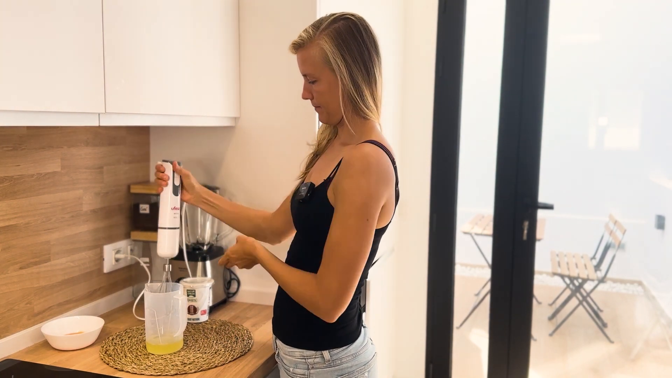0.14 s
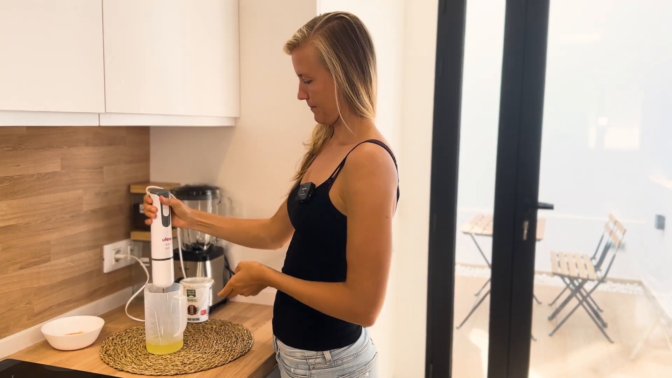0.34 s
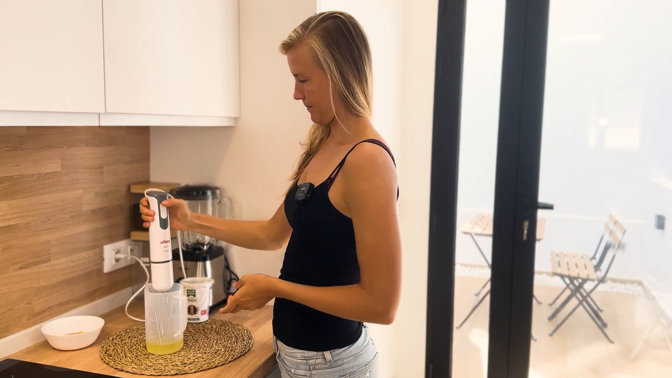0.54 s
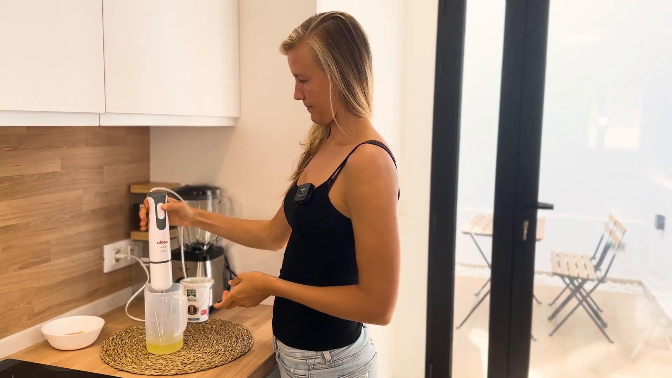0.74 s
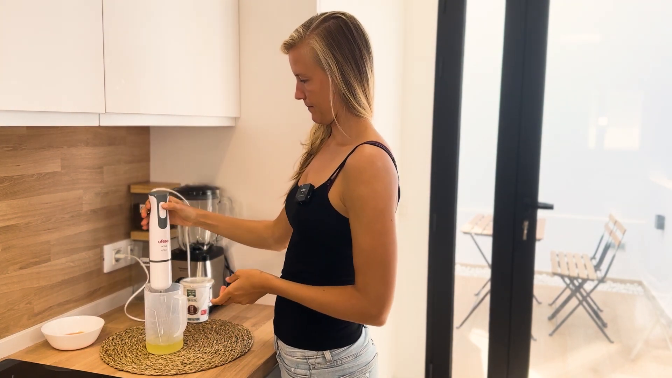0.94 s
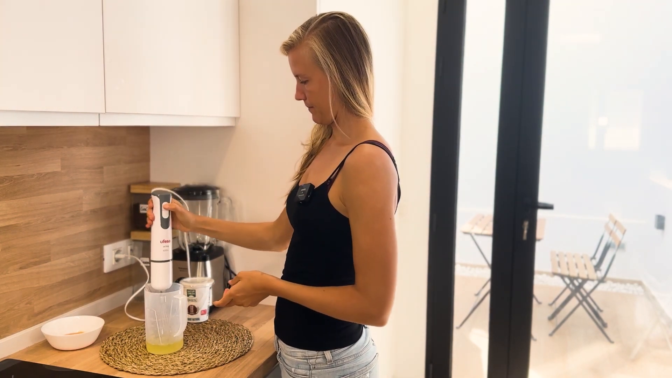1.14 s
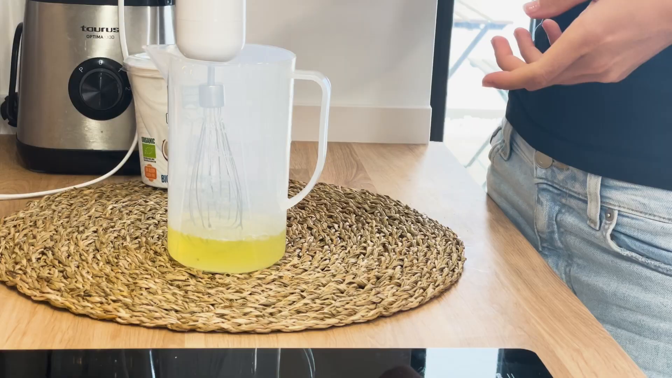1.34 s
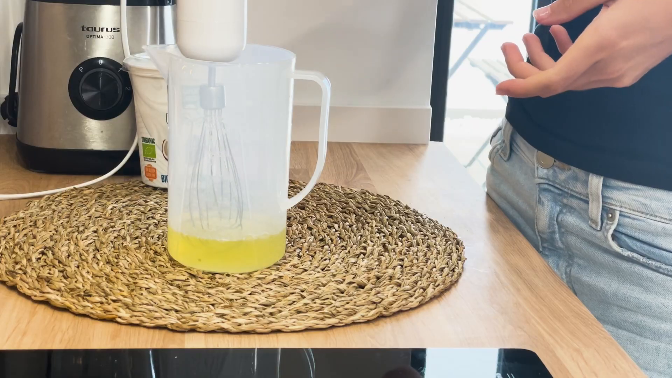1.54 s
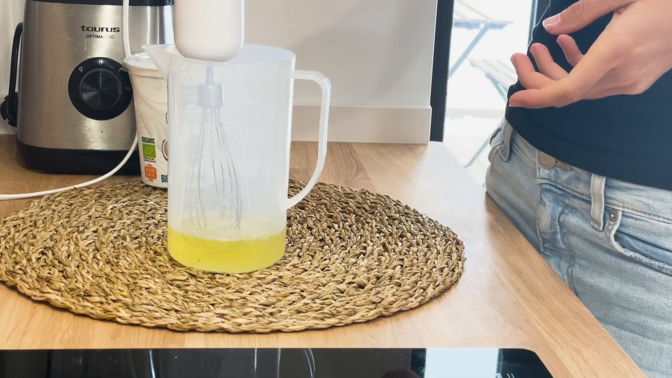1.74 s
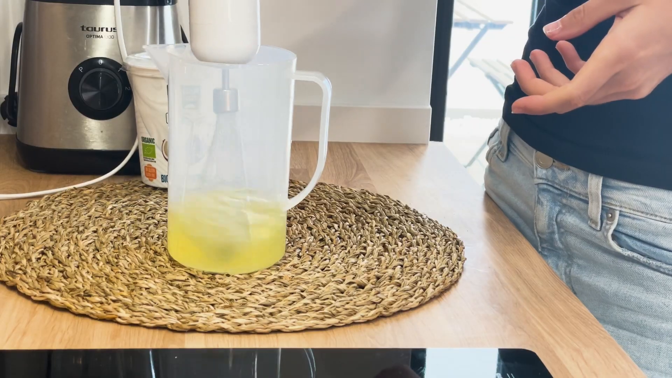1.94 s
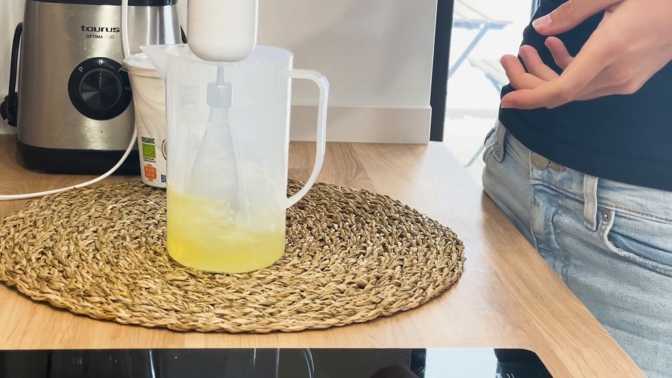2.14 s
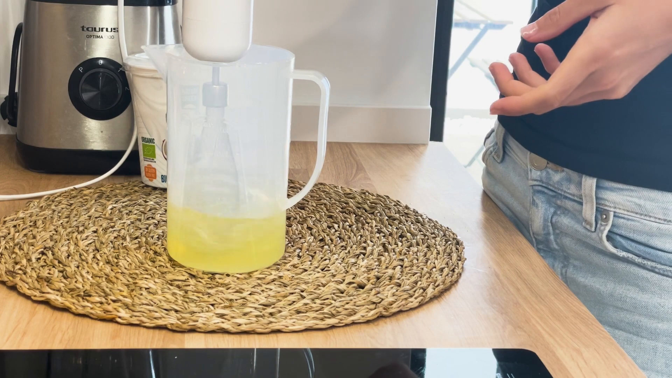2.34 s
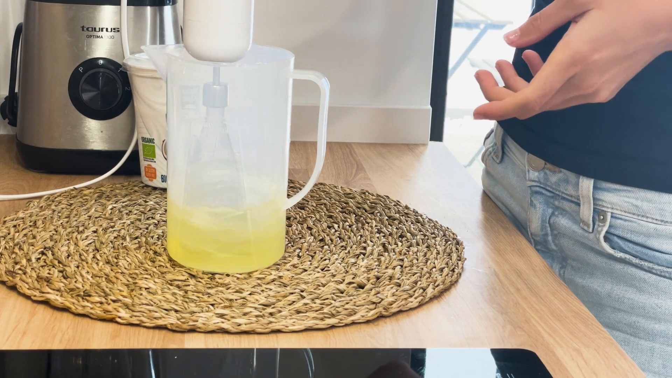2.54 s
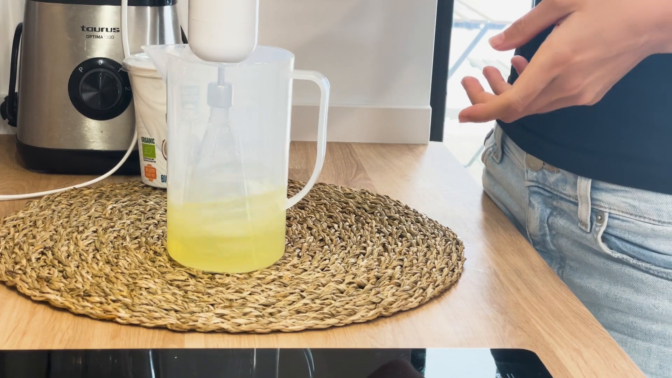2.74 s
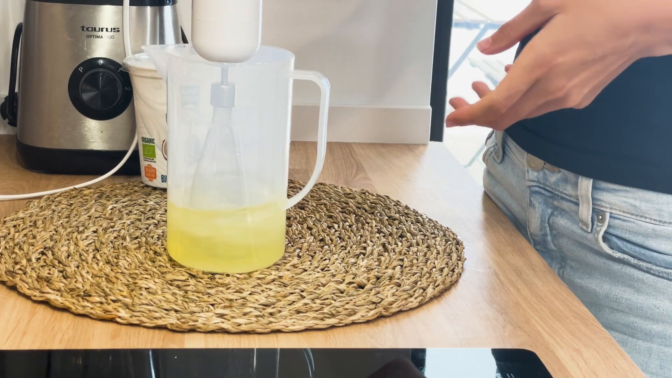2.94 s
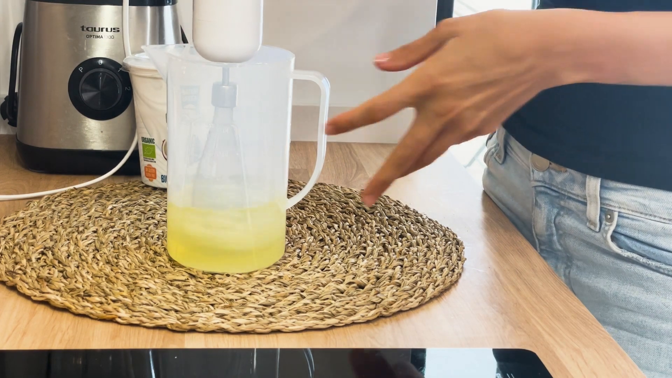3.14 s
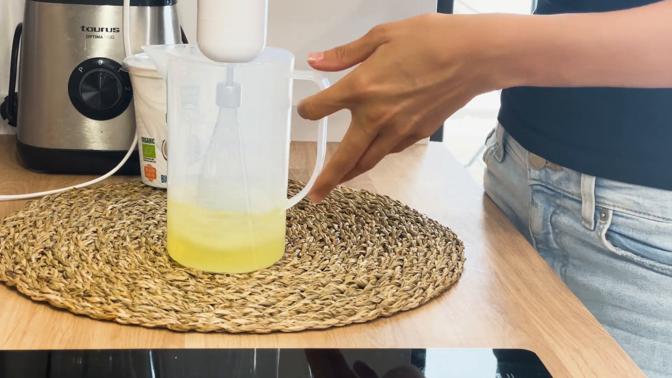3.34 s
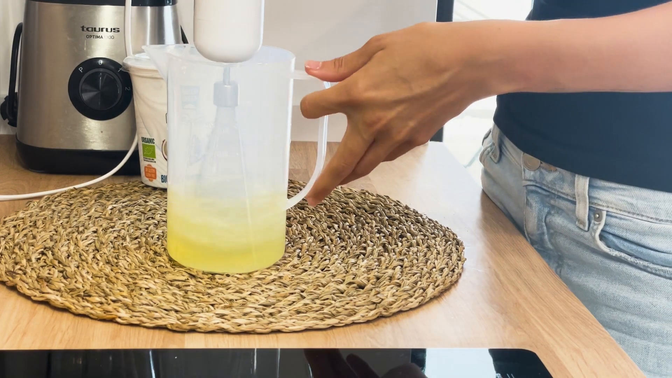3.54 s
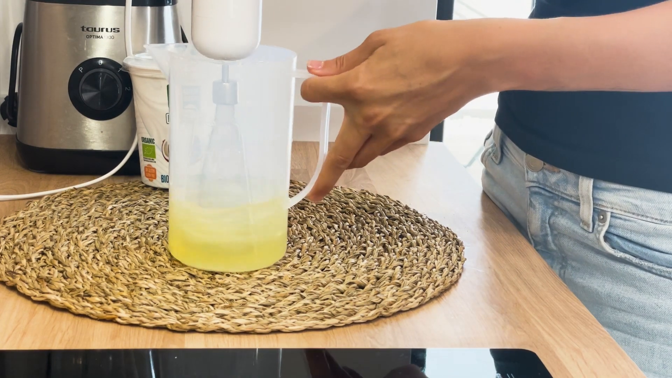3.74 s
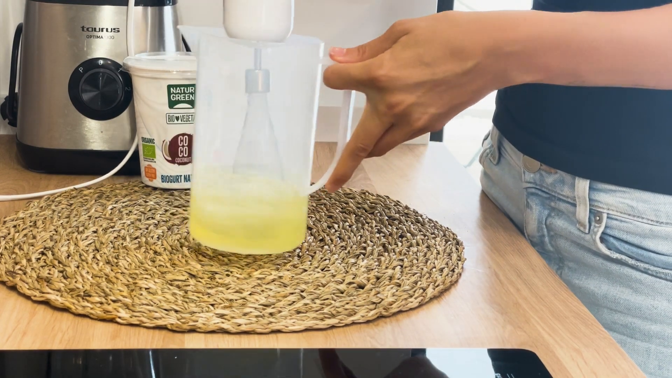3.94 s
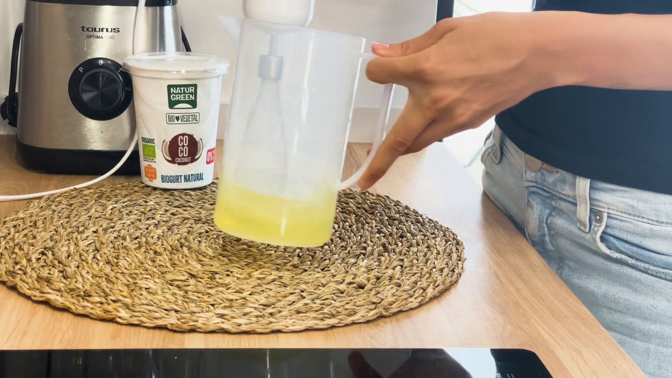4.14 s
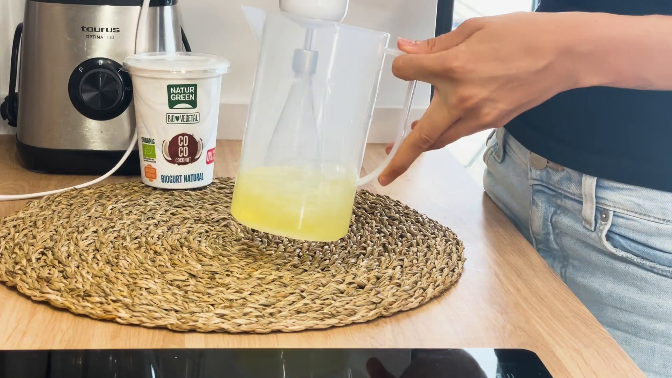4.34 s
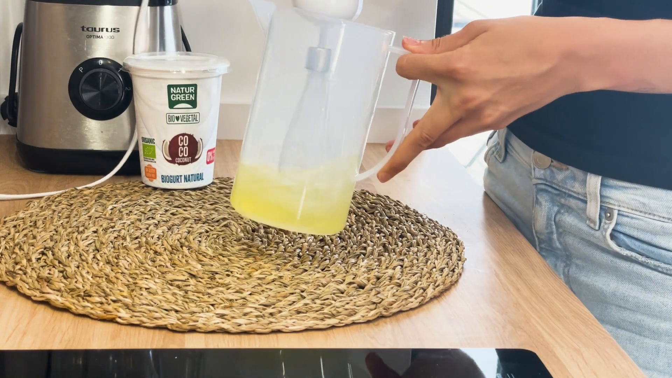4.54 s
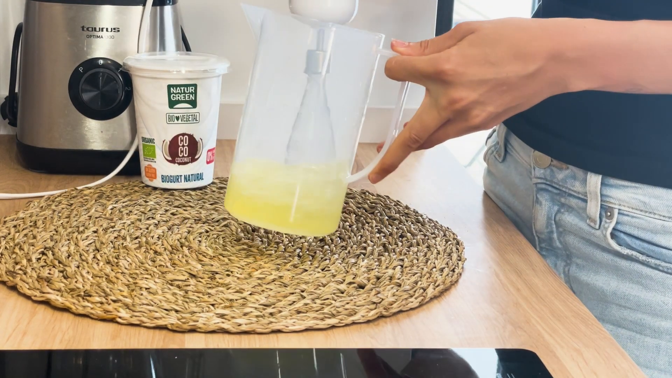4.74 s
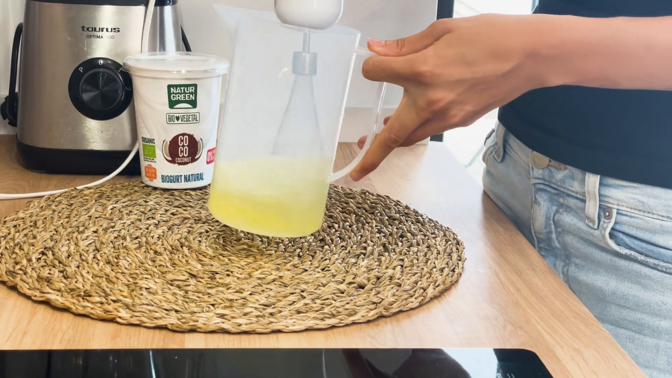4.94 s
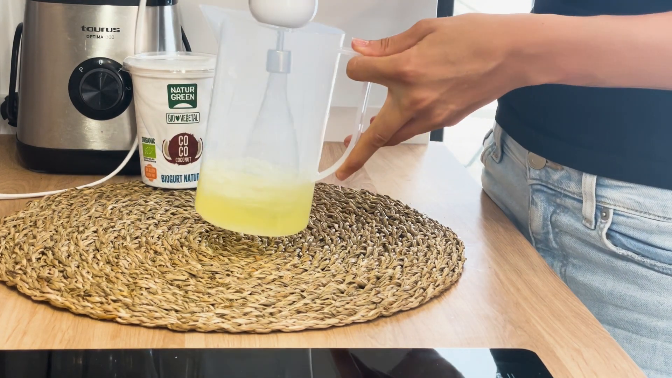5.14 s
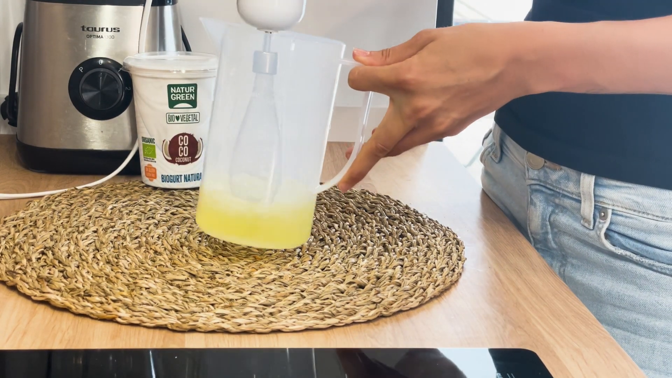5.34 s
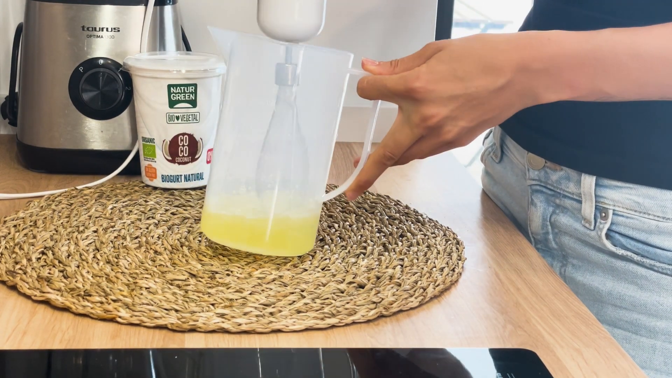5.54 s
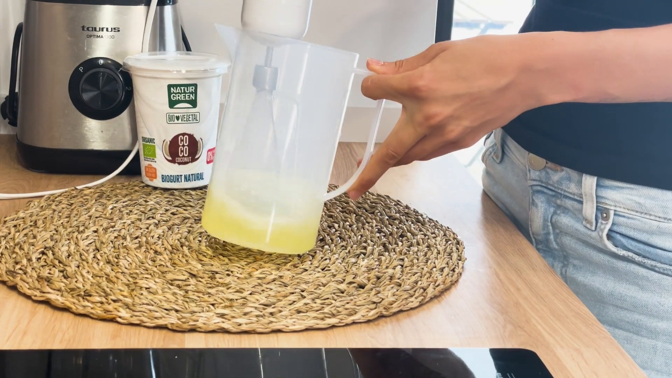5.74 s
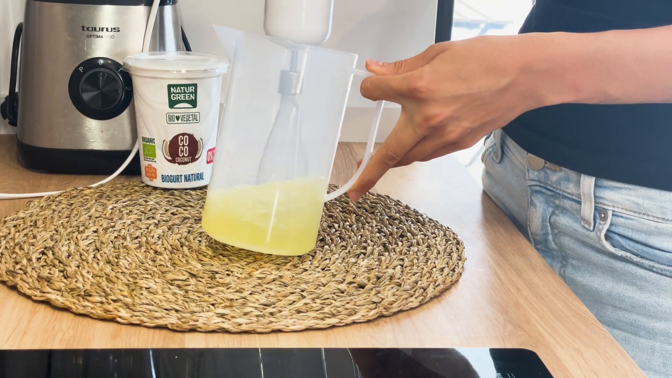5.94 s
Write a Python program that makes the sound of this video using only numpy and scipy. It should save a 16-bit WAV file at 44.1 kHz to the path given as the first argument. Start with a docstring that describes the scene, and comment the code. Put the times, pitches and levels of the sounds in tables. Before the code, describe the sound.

A wire whisk taps a plastic jug amid small grip clicks, then a hand blender whirs up, whining, hissing and clattering through liquid egg.

```python
"""A wire whisk on a hand blender knocks on a plastic jug of egg as it is lowered in, amid small grip clicks.
Switched on, the motor whines up to speed and hisses; the whisk slaps and sprays egg on the wall of the jug.
Pressed down, it drums and clatters on the bottom; then the jug is tilted and the motor eases up a little.
Ringing parts are noise or small contacts sent through resonances; the whine is a stack of sine waves.
Soft bumps boom through the counter. A small room is heard through two close microphone ports."""
import sys
import numpy as np
from scipy import signal
from scipy.fft import rfft, irfft, next_fast_len
from scipy.io import wavfile
from scipy.ndimage import uniform_filter1d, map_coordinates

SR = 44100
rng = np.random.default_rng(int(sys.argv[2]) if len(sys.argv) > 2 else 0)


def pcm_store(signal):
    """Save signal as 16-bit PCM."""
    levels = np.round(np.clip(np.atleast_2d(signal), -1, 1) * 32767)
    wavfile.write(sys.argv[1], SR, levels.astype(np.int16).T)


N = 264159
TIME = np.arange(N) / SR  # seconds

SWITCH_ON_S, SPIN_UP_S = 1.707, 0.042  # the machine's sound fades in over SPIN_UP_S
PRESS_S, LIFT_S = 2.289, 3.55  # the whisk is pressed on the bottom of the jug between these times
# motor turns per second under load and once eased; time scales of the run-up and the easing
LOADED_HZ, FREE_HZ, RUN_UP_S, EASE_S = 262, 265.3, 0.06, 0.9
GEAR_RATIO = 12.8  # motor turns for one whisk turn
# layers that follow the effort: (level_db at mean effort, db gained per db of effort)
HISS_LAW, WALL_LAW, BOOM_LAW = (-30, 0.88), (-30.5, 1.25), (-39, 1.7)
SLOSH_SHARE, SLOSH_PER_S = 0.025, 5  # stray of the jug's pitches as a share, and how often
REBOUND_DB = -21  # a second touch, one whisk turn later, against the first
CUTOFF_HZ = 15750  # top of the microphone's range

# Levels in these tables are relative, unless a function uses them as they stand.
# quiet room: pitch_hz, level_db (per Hz)
ROOM_HUSH = [(30, -17), (60, -2), (110, 11.5), (220, 5), (400, -5.5), (1000, -16), (2500, -34), (4000, -39),
             (15000, -51)]
# difference between the two ports: pitch_hz, left_lead_rad
PORT_PHASE = [(330, 0), (470, -.6), (560, -2), (600, -3.6), (700, -4.5), (860, -7.3), (1150, -7.1),
              (1550, -6.28), (2400, -6.28), (3200, -6.9), (4200, -6.5), (5300, -6.6), (5750, -4.7),
              (6750, -5.5), (7600, -4.1), (8750, -3.14), (11800, -1.4), (13100, 0)]
# difference between the two ports: pitch_hz, left_minus_right_db
PORT_BALANCE = [(60, -4), (170, 5), (340, -0.5), (480, 5.5), (620, 2.5), (850, 2.5), (950, 3.5), (1600, 0)]
# room sound that the ports do not share: pitch_hz, level_db
ROOM_WIDTH = [(150, -12), (400, -7), (700, 6), (1100, -2.5), (1800, -22.5), (3500, -5), (6500, -14),
              (8700, -17.5), (11000, 0.5), (14000, -20)]
# jug bottom on the counter: pitch_hz, width_hz, level_db
COUNTER = [(100.6, 8.7, -2), (130.6, 33.5, 0.5)]
# soft bumps through the counter: start_s, peak_db
BUMPS = [(0.039, -46), (0.107, -40.5), (0.518, -40.5), (0.655, -41), (0.83, -50), (0.923, -30.5),
         (1.029, -32), (1.645, -35), (1.742, -19.5), (1.893, -28.5), (2.005, -29), (4.327, -35.5),
         (4.99, -32.5), (5.17, -34), (5.27, -40), (5.343, -28.5), (5.69, -40)]
# fingers on the grip and switch: start_s, peak_db, hollow_knock_db, length_s, brightness_hz
TICKS = [(0.187, -42.5, -112, 0.086, 10300), (0.271, -40, -47, 0.0054, 3520),
         (0.295, -37, -37.5, 0.0052, 3840), (0.373, -28, -36, 0.0029, 12500),
         (0.722, -50, -84, 0.011, 6800), (0.884, -40, -82, 0.039, 5000), (1.336, -42.5, -88, 0.028, 1620),
         (1.382, -45, -82, 0.0025, 7200), (1.432, -62, -91, 0.06, 1770), (1.562, -54, -87, 0.1, 3000),
         (1.623, -34, -59.5, 0.0097, 2600)]
# hollow grip: pitch_hz, width_hz, level_db
GRIP = [(230, 32, 9), (292, 11, 1), (420, 110, -3), (590, 22, -4), (665, 22, -9)]
# a sharp contact: pitch_hz, level_db (per Hz)
CRACK = [(300, -9), (900, -2), (2000, 6.5), (3200, 2.5), (5000, -3), (8500, 5.5), (12000, 12), (16000, -11)]
# air in the jug: pitch_hz, width_hz, level_db
JUG_AIR = [(482.7, 37, -2), (527.2, 54.4, 9.5), (707, 18, -25)]
# plastic wall of the jug: pitch_hz, width_hz, level_db
JUG_WALL = [(1247, 122, 5), (1966, 90, 4.5), (2067, 90, -7.5), (2460, 220, -3.5), (2812, 270, -0.5),
            (2992, 300, -0.5), (3116, 107, -9), (3393, 200, 2.5), (3646, 160, 2.5), (4090, 180, 1.5),
            (4390, 170, -4), (4560, 440, -6), (4900, 150, -12), (5600, 790, -8.5), (6310, 450, 2.5),
            (6660, 250, -20.5)]
# jug bottom under the wires: pitch_hz, width_hz, level_db
JUG_BOTTOM = [(608, 83, 13.5), (645.6, 31, 9), (959, 82, -5.5), (1386, 134, -1.5), (1674, 220, -6),
              (2130, 140, -1.5), (3194, 120, -0.5), (4890, 150, -6.5)]
# wire loops of the whisk: pitch_hz, width_hz, level_db
WIRES = [(2520, 150, -9), (2938, 140, 5), (3090, 120, 3), (3180, 240, -15.5), (4050, 170, -6),
         (4380, 560, -12.5), (4900, 370, -14.5), (5660, 330, -13), (6100, 240, -10), (7120, 330, -10.5)]
# dry whisk on the jug: start_s, wall_db, air_db, wires_db, length_s, pitch_share, wire_brightness_hz
DRY_KNOCKS = [(0.481, -46.5, -39.5, -40, 0.034, .94, 4000), (0.594, -54, -48, -35, 0.006, 0.8, 2000),
              (0.614, -51, -44, -42.5, .026, 1.01, 5000), (0.735, -59, -54, -66, 0.013, 1.0, 5000),
              (0.905, -39, -40, -36, 0.039, 1.0, 9000), (0.915, -44, -36.5, -45, 0.03, 1.0, 9000),
              (0.95, -50, -51, -48, 0.059, 1.0, 9000), (1.001, -55, -50, -52, 0.025, 0.85, 5000),
              (1.047, -53, -61, -44, 0.02, 1.0, 11000)]
# first sprays of egg on the wall: start_s, level_db, length_s
SPRAYS = [(1.877, -27, .009), (1.98, -32, .016), (2.018, -32, .01)]
# fine spray: pitch_hz, level_db (per Hz)
SPRAY = [(1000, -30), (3000, -6), (5000, -15), (7500, 0), (11000, 6), (15000, -8)]
# spinning wires slapping the jug: start_s, level_above_1_khz_db, boom_db, length_s
SLAPS = [(1.878, -23, -19.5, 0.012), (2.071, -20, -39, 0.022), (2.113, -16.5, -28, 0.014),
         (2.284, -16, -18, 0.0063), (2.358, -39, -26, 0.0057), (2.389, -25, -36, 0.0048),
         (2.433, -20.5, -26, 0.015), (2.48, -17.5, -21, 0.012), (2.526, -16.5, -17.5, 0.01),
         (2.581, -21, -13.5, 0.0082), (2.632, -12.5, -17, 0.0048), (2.677, -18.5, -23, 0.0033),
         (2.726, -17.5, -32, 0.0058), (2.776, -18.5, -23, 0.0085), (2.82, -16, -29, 0.0063),
         (2.875, -14.5, -46, 0.0032), (2.92, -16, -43, 0.0051), (2.982, -18.5, -14.5, 0.006),
         (3.029, -17, -20.5, 0.01), (3.131, -27, -24.5, 0.0061), (3.161, -30, -24, 0.007),
         (3.272, -26, -23, 0.0092), (3.322, -23, -26.5, 0.0084), (3.373, -35, -45, 0.0033),
         (3.424, -26, -19, 0.0041), (3.517, -25.5, -18.5, 0.0086), (3.594, -22, -38, .008),
         (3.727, -18.5, -15, 0.0086), (3.767, -16, -21, 0.019), (3.937, -17.5, -24.5, 0.0092),
         (4.156, -22, -24.5, 0.035), (4.501, -17.5, -19.5, 0.013), (4.726, -17.5, -17, 0.023),
         (5.299, -25, -45, 0.011), (5.435, -17.5, -41, 0.0094), (5.489, -18, -45, 0.0094),
         (5.605, -16, -67, 0.014), (5.657, -19, -30.5, 0.016), (5.756, -23, -18.5, 0.011),
         (5.93, -19, -52, .02)]
# egg thrown about: pitch_hz, level_db (per Hz)
SPLASH = [(200, -35.5), (400, -9), (800, -6), (1050, -0.5), (1400, 0.5), (2400, 2.5), (3300, -4),
          (4500, -7.5), (8000, 1.5), (15000, -16)]
# wires rubbing on the wall: pitch_hz, width_hz, level_db
SCRAPE = [(2639, 63, 1), (2935, 57, 3), (3070, 110, -1)]
# how loudly they rub: time_s, level_db
RUBBING = [(1.75, -61), (1.88, -30.5), (2.0, -42), (2.45, -39), (2.7, -36.5), (3.0, -32.5), (3.35, -34),
           (3.7, -34.5), (4.08, -42), (4.35, -75), (5.15, -49), (5.3, -34), (5.47, -35.5), (5.6, -45),
           (5.95, -42)]
# how hard the whisk presses on the bottom: time_s, level_db
PRESSING = [(2.27, -52), (2.3, -32.5), (2.4, -38.5), (2.55, -31), (2.72, -34), (2.87, -38.5), (3.02, -27.5),
            (3.12, -34), (3.28, -33.5), (3.38, -28.5), (3.5, -25.5), (3.58, -45), (3.68, -67), (3.8, -84)]
# how hard the whisk churns the egg: time_s, effort_db
EFFORT = [(1.76, -19.5), (1.86, -19), (1.95, -21.5), (2.04, -19.5), (2.11, -22), (2.2, -25), (2.27, -24),
          (2.52, -22), (3.0, -22), (3.5, -20.5), (3.69, -22.5), (3.79, -25.5), (3.88, -24.5), (4.06, -22),
          (4.19, -29.5), (4.27, -20.5), (4.33, -29), (4.46, -25.5), (4.54, -23.5), (4.67, -24.5),
          (4.76, -26), (4.86, -25), (4.94, -22.5), (5.02, -26), (5.19, -28), (5.3, -22.5), (5.47, -23),
          (5.56, -25.5), (5.66, -28), (5.73, -25), (5.87, -27), (5.95, -23.5)]
# motor whine: multiple_of_motor_speed, level_db
WHINE = [(1, -19.5), (2, -13.5), (3, -26.5), (4, -15), (5, -19.5), (10, -19), (11, -14), (12, -19),
         (13, -17.5), (22, -9.5), (48, -18)]
# meshing gears singing on the run-up: multiple_of_motor_speed, centre_s, length_s, level_db
STRAIN = [(11, 1.827, 0.026, 5.5), (11, 1.9, .022, -5), (22, 1.772, 0.015, -12), (22, 1.925, 0.051, -6),
          (33, 1.772, .02, -9), (44, 2, .025, -10)]
# brushes and gears: pitch_hz, level_db (per Hz)
HISS = [(50, -94), (130, -13), (340, -6.5), (480, -8), (820, -9.5), (1000, -2), (2000, 1.5), (3100, 1.5),
        (4500, -5), (5900, 3), (7200, 3.5), (8600, 7), (10000, 4), (13000, -7), (14600, -11), (15700, -39)]
# motor housing: pitch_hz, width_hz, level_db
HOUSING = [(988, 11, 9.5), (1326, 270, -5.5), (1665, 42, -1.5), (1940, 20, 2), (2386, 17, 2.5),
           (2654, 66, 3), (2936, 8.7, 8.5), (3220, 150, -10.5), (3300, 80, -6), (3870, 74, -2.5)]
# whisk shaft and gearbox: pitch_hz, width_hz, level_db
GEARBOX = [(970.6, 88, -3), (5600, 190, -3), (6190, 97, -1.5), (12700, 930, -20.5)]


def from_db(db):
    """Turn decibels into a gain."""
    return 10 ** (np.asarray(db) / 20)


def rms_one(x):
    """Scale to an average (rms) level of 1."""
    return x / np.sqrt(np.mean(x ** 2) + 1e-20)


def in_time(rows):
    """Read each column of a timed table at every sample."""
    times, *columns = np.transpose(rows)
    return [np.interp(TIME, times, column) for column in columns]


def at_hz(points, hz):
    """Read a table on a log-frequency axis."""
    known_hz, values = np.transpose(points)
    return np.interp(np.log(hz + 1e-6), np.log(known_hz), values)


def drift(rate):
    """Slow random wandering of spread 1; rate in Hz."""
    step = 40  # samples between the computed points
    r = np.exp(-2 * np.pi * step * rate / SR)
    noise = rng.standard_normal(N // step + 2002)
    slow = signal.lfilter([1], [1, -2 * r, r * r], noise)[2000:]  # skip the settling
    return np.interp(np.arange(N) / step, np.arange(len(slow)), rms_one(slow))


def colour(x, spectrum, size=2048):
    """Give a sound this spectrum, with a filter that answers without delay (minimum phase)."""
    gain = from_db(at_hz(spectrum, np.fft.rfftfreq(size, 1 / SR)))
    cepstrum = irfft(np.log(gain))
    cepstrum[1:size // 2] *= 2
    cepstrum[size // 2 + 1:] = 0
    return signal.oaconvolve(x, irfft(np.exp(rfft(cepstrum))))[:N]


def low_pass(x, hz, order):
    """Dull a sound above the given pitch."""
    return signal.sosfilt(signal.butter(order, hz, fs=SR, output="sos"), x)


def resonate(x, modes, order=1):
    """Add up side-by-side resonances, each with its peak level; order 2 has steeper skirts."""
    out = np.zeros(len(x))
    for hz, width, db in modes:
        r = np.exp(-np.pi * width / SR)
        turn = -2 * r * np.cos(2 * np.pi * hz / SR)
        section = [(1 - r * r) / 2, 0, (r * r - 1) / 2, 1, turn, r * r]
        out += from_db(db) * signal.sosfilt([section] * order, x + 1e-18)
    return out


def even(x, span_s=0.17):
    """Hold the level at 1 over every short span; faster beats remain."""
    power = uniform_filter1d(x * x, int(span_s * SR))
    return x / np.sqrt(np.maximum(power, 0) + 1e-20)


def grains(per_s, spread_db):
    """Scatter tiny contacts of uneven size at random."""
    sizes_db = spread_db * np.minimum(rng.exponential(1, N), 4)
    sizes = from_db(sizes_db) * rng.choice([-1, 1], N)
    return sizes * (rng.random(N) < per_s / SR)


def bursts(times, levels_db, lengths_s, rise_s):
    """Draw the loudness of contacts that swell quickly and die away."""
    power = np.zeros(N)
    for s, db, length in zip(times, levels_db, lengths_s):
        start = int(s * SR)
        age = TIME[:min(N - start, SR // 2)]
        shape = (1 - np.exp(-age / rise_s)) * np.exp(-age / max(length, 1e-3))
        power[start:start + len(age)] += (from_db(db) * shape / shape.max()) ** 2
    return np.sqrt(power)


def strike(envelope, drive, modes, order=1):
    """Feed resonances with contacts under an envelope; they ring on when it ends."""
    return resonate(envelope * drive, modes, order) / np.std(resonate(drive, modes, order))


def restless(x, modes, swell_db, per_s):
    """The point of contact moves, so each mode swells and fades on its own."""
    out = np.zeros(N)
    for mode in modes:
        swell = from_db(swell_db * np.clip(drift(per_s), -1.6, 1.6))
        out += resonate(x * swell, [mode], order=2)
    return out


def wander(x, share, per_s):
    """Let the pitch stray by about this share, by reading the sound a little early or late."""
    shift_s = share / (2 * np.pi * per_s) * drift(per_s)
    return map_coordinates(x, [(TIME + shift_s) * SR], order=3, mode="nearest")


def sloshed(x):
    """The moving egg detunes the jug."""
    return wander(x, SLOSH_SHARE, SLOSH_PER_S)


def room_hush(level_db):
    """Steady noise of the quiet room, strongest in the bass."""
    return from_db(level_db) * rms_one(colour(rng.standard_normal(N), ROOM_HUSH))


def kitchen(x, t60_s=0.47, treble_t60_s=0.25, split_hz=4000):
    """Blurred reflections of a small room; the treble dies first (t60: time to fall 60 dB)."""
    age = TIME[:SR * 3 // 4]
    noise = rng.standard_normal(len(age)) * np.clip(age / 0.005, 0, 1)
    low = low_pass(noise, split_hz, 1)
    tail = low * from_db(-60 * age / t60_s)
    tail += (noise - low) * from_db(-60 * age / treble_t60_s)
    return signal.oaconvolve(x, tail / np.sqrt(np.sum(tail ** 2)))[:N]


def bumps(level_db=-10.0, length_s=0.046, rise_s=0.0027, low_db=10.0, dull_db=-7.0, low_hz=82,
          high_hz=200, handle_db=-2.0, handle_hz=190, handle_width_hz=80):
    """Dull pushes boom in the counter's lowest mode; higher once the jug is tilted by its handle."""
    times, peak_db = np.transpose(BUMPS)
    flat = colour(rng.standard_normal(N), [(100, low_db), (150, -low_db)])
    tilted = rng.standard_normal(N)
    boom = even(resonate(np.where(TIME < LIFT_S, flat, tilted), COUNTER, order=2), span_s=0.019)
    band = signal.butter(2, [low_hz, high_hz], "band", fs=SR, output="sos")
    thump = rms_one(signal.sosfilt(band, rng.standard_normal(N)))
    handle = even(resonate(rng.standard_normal(N), [(handle_hz, handle_width_hz, 0)], order=2))
    handle *= TIME > LIFT_S
    push = from_db(level_db) * bursts(times, peak_db, np.full(len(times), length_s), rise_s)
    return push * (boom + from_db(dull_db) * thump + from_db(handle_db) * handle)


def ticks(click_db=-17.0, knock_db=1.0):
    """Plastic clicks and short uneven rubs, bright or dull, with the hollow knock of the grip."""
    touch = rng.standard_normal(N)
    crack = rms_one(colour(touch, CRACK))
    out = np.zeros(N)
    for s, db, _, length, hz in TICKS:
        dull = low_pass(crack, hz, 2)
        # only the longer touches catch unevenly
        catching = from_db(4 * (length > 0.02) * np.clip(drift(45), -1.5, 1.5))
        out += bursts([s], [db + click_db], [length], length / 4) * rms_one(dull * catching)
    times, _, hollow_db, lengths, _ = np.transpose(TICKS)
    return out + strike(bursts(times, hollow_db + knock_db, lengths, 0.00036), touch, GRIP)


def dry_knocks(ring_db=-27.0, ring_s=0.04, dry_width=0.52, soft_hz=1400, crack_db=-6.0, vary_db=2.0):
    """Springy wires chatter on the dry jug and ring out; each knock has its own mix of modes."""
    out, age = np.zeros(N), TIME[:SR // 3]
    for s, wall_db, air_db, wires_db, length, pitch, bright_hz in DRY_KNOCKS:
        chatter = grains(2500, 2.5)[:len(age)]
        soft = low_pass(chatter, soft_hz, 1)
        hard = low_pass(chatter, bright_hz, 2)
        sound = from_db(wires_db + crack_db) * rms_one(colour(hard, CRACK)[:len(age)])
        parts = ((soft, JUG_WALL, wall_db, pitch, dry_width),
                 (chatter, JUG_AIR, air_db, pitch, 1),
                 (hard, WIRES, wires_db, 1, 1))
        for drive, modes, db, tuning, damping in parts:
            spot = [(hz * tuning, width * damping, level + vary_db * rng.standard_normal())
                    for hz, width, level in modes]
            # play the chatter twice and keep the second pass, when the modes already ring
            ringing = resonate(np.tile(drive, 2), spot, order=2)[len(age):]
            sound += from_db(db) * even(ringing, span_s=0.013)
        fade = np.exp(-(age / length) ** 4) + from_db(ring_db) * np.exp(-age / ring_s)
        start = int(s * SR)
        out[start:start + len(age)] += (1 - np.exp(-age / 0.002)) * fade * sound
    return out


def sprays():
    """Bright spatter of tiny drops as the whisk first flings the egg outwards."""
    times, levels_db, lengths = np.transpose(SPRAYS)
    return bursts(times, levels_db, lengths, 0.004) * rms_one(colour(grains(6900, 2.5), SPRAY))


def wire_touches():
    """List the slaps, and the softer rebounds of the whisk one turn later once it is lifted."""
    turn_s = GEAR_RATIO / LOADED_HZ
    rebounds = [(s + turn_s, db + REBOUND_DB, boom_db + REBOUND_DB, length)
                for s, db, boom_db, length in SLAPS if s > LIFT_S]
    return list(SLAPS) + rebounds


def slaps(ring_db=-14.5, boom_db=-5.5, boom_ring_s=0.0082, crack_db=-31.0, clatter_db=-8.0,
          splat_db=-9.0, knock_db=-6.0):
    """Wires chatter and splat on the wet jug; pressed down, they make the bottom clatter and knock."""
    times, high_db, low_db, lengths = np.transpose(wire_touches())
    chatter = grains(8000, 1.0)
    pressed = (TIME > PRESS_S) & (TIME < LIFT_S)
    high = bursts(times, high_db, lengths, 0.0052)
    low = bursts(times, low_db, lengths + boom_ring_s, 0.0049)
    wall = from_db(ring_db) * strike(high, chatter, JUG_WALL, order=2)
    bottom = from_db(clatter_db) * strike(high * pressed, chatter, JUG_BOTTOM[2:], order=2)
    bottom += from_db(knock_db) * strike(high * pressed, chatter, JUG_BOTTOM[:2], order=2)
    crack = from_db(crack_db) * rms_one(colour(chatter, CRACK))
    splat = from_db(splat_db) * rms_one(colour(chatter, SPLASH))
    air = from_db(boom_db) * low * even(resonate(chatter, JUG_AIR, order=2), span_s=0.029)
    return wall + high * (crack + splat) + sloshed(bottom + air)


def scrape(turns, swing_db=-2.0, stray=0.0077):
    """Wires rub on the wall, singing in wandering strands that swing with each whisk turn."""
    rub_db, = in_time(RUBBING)
    grip = from_db(swing_db * np.cos(2 * np.pi * turns / GEAR_RATIO))
    singing = even(resonate(grains(900, 4.5) * grip, SCRAPE, order=2))
    return from_db(rub_db) * wander(singing, stray, 9.7)


def drumming(turns, thud_db=-4.5, rattle_db=6.0, most_db=-47.0, lag=0.52, slip=0.026, low_mode_db=-6.0,
             stray=0.025, rumble_db=-8.0, rumble_hz=143, rumble_width_hz=24):
    """Each whisk turn the plastic bottom rattles, then the counter thuds; dragging wires rumble."""
    drum_db, = in_time(PRESSING)
    cycle = (turns / GEAR_RATIO - lag + slip * drift(5.3)) % 1  # lag and slip in whisk turns
    force = from_db(1.5 * np.clip(drift(22.0), -2, 2))
    knocks = np.diff(cycle, prepend=0) < -0.5  # the moment a new cycle begins
    (hz, width, db), (upper_hz, upper_width, upper_db) = COUNTER
    damped = [(hz, width, db + low_mode_db), (upper_hz, 1.25 * upper_width, upper_db)]
    thud = strike(from_db(drum_db + thud_db) * force, knocks * 1.0, damped, order=2)
    rumble = even(resonate(rng.standard_normal(N), [(rumble_hz, rumble_width_hz, 0)], order=2))
    thud += from_db(drum_db + rumble_db) * rumble
    fading = np.exp(-((cycle + 0.3) % 1) / 0.12)  # starts 0.3 of a turn before the thud
    rattle = even(resonate(grains(4000, 7.0) * fading * force, JUG_BOTTOM, order=2))
    rattle_gain = from_db(np.minimum(drum_db, most_db) + rattle_db)
    return wander(thud, stray, 5.5) + rattle_gain * sloshed(rattle)


def whisk(turns, wall_db, boom_db, swing_db=3.0, wire_db=3.5, wall_gain_db=-8.0, whirr_db=-9.5,
          splash_db=-6.0, boom_gain_db=-1.5):
    """Wire loops scrape the wall, whirr on the bottom and throw egg, hardest once a turn."""
    angle = 2 * np.pi * turns / GEAR_RATIO
    wires = np.cos(3 * angle) + np.clip(drift(110), -1.3, 1.3)
    pressure = from_db(swing_db * np.cos(angle) + wire_db * wires)
    touches = grains(1100, 3.5) * pressure
    wall = from_db(wall_gain_db) * even(restless(touches, JUG_WALL, 4.5, 14))
    whirr = from_db(whirr_db) * even(restless(touches, JUG_BOTTOM[2:], 5, 14))
    splash = from_db(splash_db) * even(colour(grains(6000, 3.0) * pressure, SPLASH))
    air = from_db(boom_db + boom_gain_db) * even(resonate(touches, JUG_AIR, order=2))
    return from_db(wall_db) * (sloshed(wall + whirr) + splash) + sloshed(air)


def follow_effort(law):
    """Level in dB of a layer that rises and falls with the effort."""
    effort_db, = in_time(EFFORT)
    level_db, slope = law
    return level_db + slope * (effort_db - effort_db[TIME > SWITCH_ON_S].mean())


def run_up():
    """Share of its full speed that the motor has reached."""
    return (1 - np.exp(-np.maximum(TIME - SWITCH_ON_S, 0) / RUN_UP_S)) ** 0.45


def unloaded():
    """How far the load on the motor has eased after the whisk lifts, 0 to 1."""
    return np.clip((TIME - LIFT_S) / EASE_S, 0, 1)


def shaft_turns(wobble=0.0017):
    """Count motor turns from the press onwards; the speed wavers a little at random."""
    speed_hz = LOADED_HZ + (FREE_HZ - LOADED_HZ) * unloaded()
    turns = np.cumsum(speed_hz * run_up() * (1 + wobble * drift(21.0))) / SR
    return turns - turns[int(PRESS_S * SR)]


def whine(turns, flutter_db=4.5, play=0.0066, mesh_db=-6.0, mesh_blur=65, eased_db=-2.0):
    """Multiples of the motor speed, blurred by gear play; gears sing early and quieten as load eases."""
    gear_db = eased_db * unloaded()
    # an octave of the gear mesh, spread into a band
    mesh = 2 * np.pi * 21.96 * turns
    blurred = drift(mesh_blur) * np.cos(mesh) + drift(mesh_blur) * np.sin(mesh)
    out = from_db(mesh_db + gear_db) * blurred
    for order, db in WHINE:
        phase = order * turns + order * play * drift(13.3)
        flutter = min(order / 4, 1) * flutter_db * drift(28)
        level_db = db + flutter + (order >= 10) * gear_db
        out += from_db(level_db) * np.sqrt(2) * np.sin(2 * np.pi * phase)
    out *= run_up() ** 6
    for order, s, length, db in STRAIN:
        tone = np.sin(2 * np.pi * order * (turns + 0.008 * drift(70)))
        rough = (1 + 0.6 * drift(70)) * tone
        out += from_db(db) * np.exp(-((TIME - s) / length) ** 2 / 2) * rough
    return out


def motor(turns, hiss_db, whine_db=-2.5, housing_db=-7.5, gearbox_db=-12.5, pulsing=0.041):
    """Whine, brush hiss that pulses with every turn, and the ringing housing and gearbox."""
    pulse = 1 + pulsing * np.cos(2 * np.pi * turns)
    brushes = rms_one(colour(grains(16000, 3.0) * pulse, HISS))
    housing = from_db(housing_db) * rms_one(resonate(rng.standard_normal(N) * pulse, HOUSING))
    gearbox = from_db(gearbox_db) * even(resonate(rng.standard_normal(N) * pulse, GEARBOX, order=2))
    steady_db = (hiss_db + np.median(hiss_db)) / 2  # changes half as much as the hiss
    ringing = from_db(whine_db) * whine(turns) + housing + gearbox
    return from_db(hiss_db) * brushes + from_db(steady_db) * ringing


def scene(room_db=-10.5, knock_room_db=-7.5, side_db=-6.0, floor_db=-65.5):
    """Put blender, jug and room together, as a left and a right channel."""
    hiss_db, wall_db, boom_db = map(follow_effort, (HISS_LAW, WALL_LAW, BOOM_LAW))
    turns = shaft_turns()
    running = np.clip((TIME - SWITCH_ON_S) / SPIN_UP_S, 0, 1)
    machine = motor(turns, hiss_db) + whisk(turns, wall_db, boom_db) + scrape(turns) + drumming(turns)
    machine *= running
    knocks = dry_knocks() + slaps() + sprays() + ticks()
    direct = machine + knocks + bumps() + room_hush(floor_db)
    mid = direct + kitchen(from_db(room_db) * machine + from_db(knock_room_db) * knocks)
    side = from_db(side_db) * colour(kitchen(direct), ROOM_WIDTH)
    return np.array([mid + side, mid - side])


def record(dry):
    """The two ports hear each pitch with their own phase and level; rumble and top are cut."""
    size = next_fast_len(N + SR // 4)
    hz = np.fft.rfftfreq(size, 1 / SR)
    lean = from_db(at_hz(PORT_BALANCE, hz) / 2)
    ports = np.array([lean, np.exp(-1j * at_hz(PORT_PHASE, hz)) / lean])
    heard = irfft(rfft(dry, size) * ports, size)[:, :N]
    heard = signal.sosfilt(signal.butter(4, 56, "high", fs=SR, output="sos"), heard)
    return signal.sosfilt(signal.ellip(12, 0.1, 80, CUTOFF_HZ, fs=SR, output="sos"), heard)


dry = scene()
out = record(dry)
pcm_store(out)
```